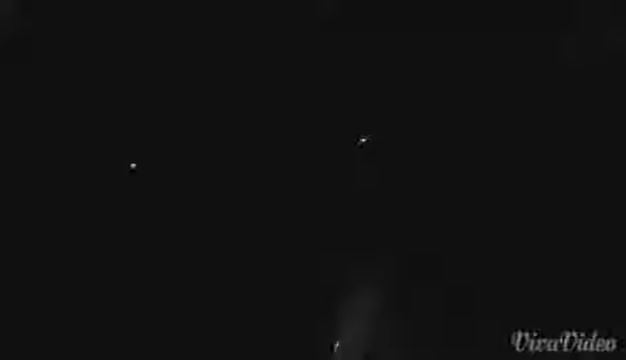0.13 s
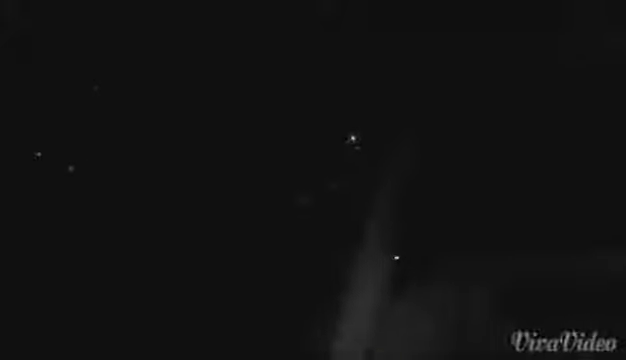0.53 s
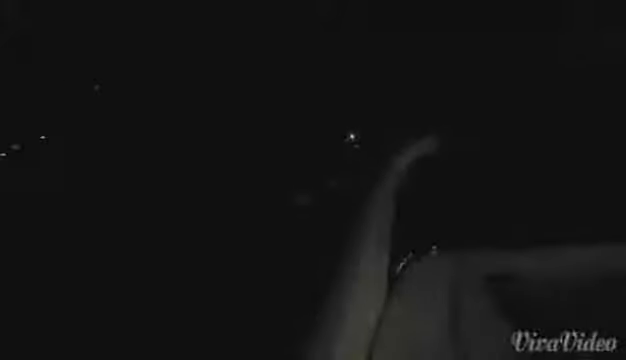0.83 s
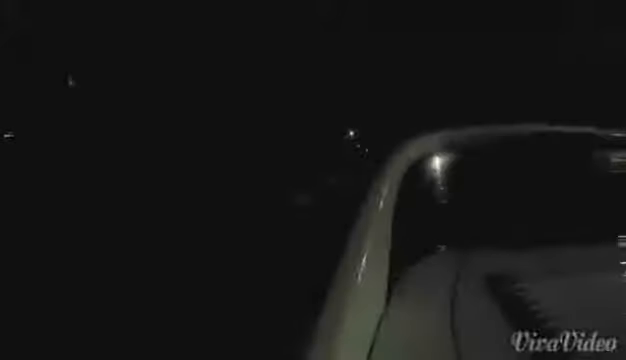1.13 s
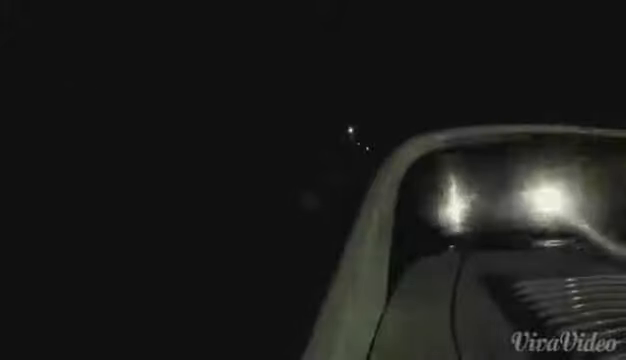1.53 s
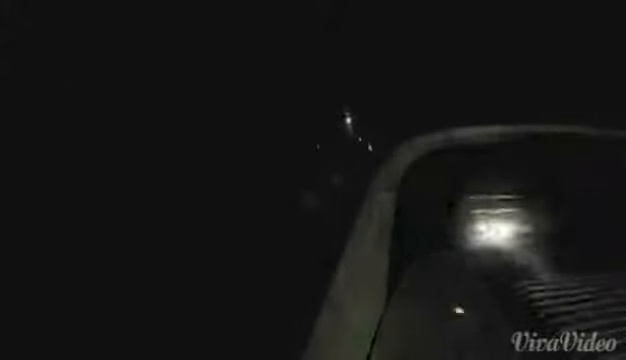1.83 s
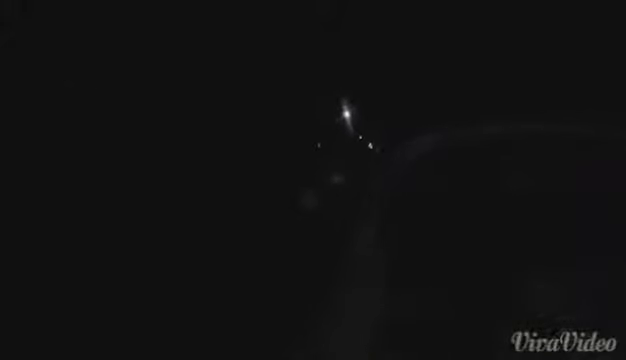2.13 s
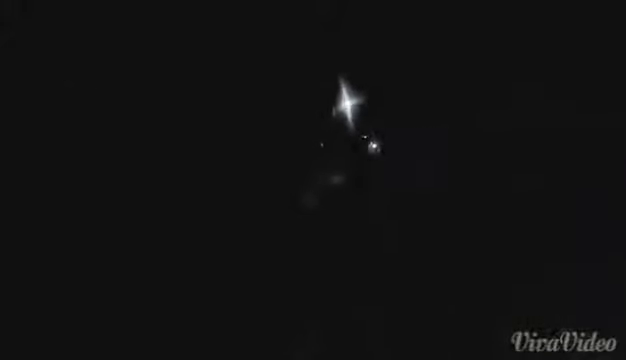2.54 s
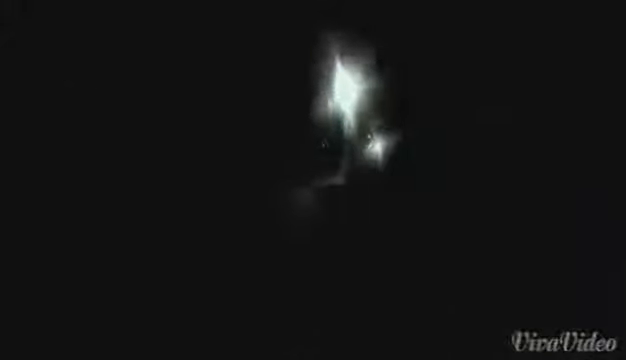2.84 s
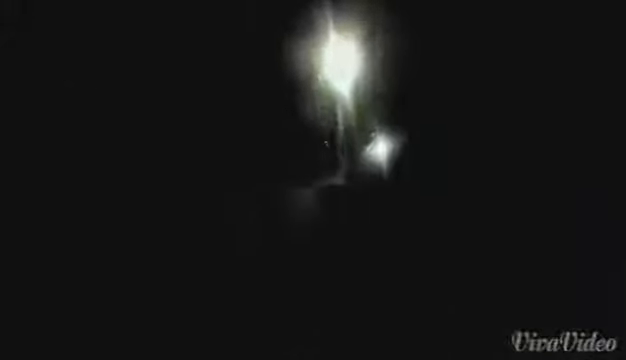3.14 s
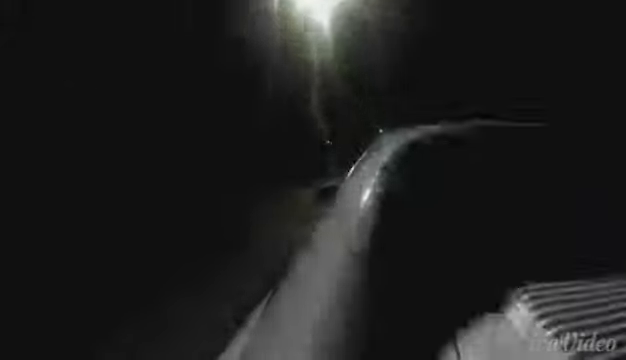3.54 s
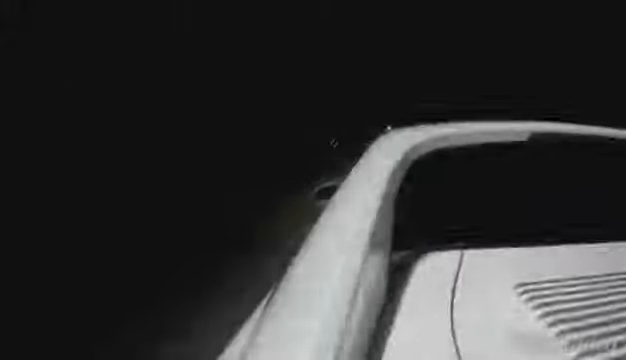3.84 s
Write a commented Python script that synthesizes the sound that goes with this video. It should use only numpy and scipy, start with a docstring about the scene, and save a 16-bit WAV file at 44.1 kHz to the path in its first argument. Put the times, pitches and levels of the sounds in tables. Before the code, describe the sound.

A turbo car pulls and lifts twice, its exhaust droning, with hissing flutter at each lift.

```python
"""On the road, microphone outside the body of a turbocharged four-cylinder car, wind buffeting it.
The car pulls, lifts, pulls and lifts again. The exhaust drones through fixed body resonances,
over road rumble and a rushing roar of air that pulses with the firings. At each lift the compressor
surges in hissing chuffs, falling chirps and hollow hoots; at full boost the turbine briefly whistles."""
import sys
import numpy as np
from scipy import signal
from scipy.fft import rfft, irfft, next_fast_len
from scipy.io import wavfile

SR = 44100
rng = np.random.default_rng(int(sys.argv[2]) if len(sys.argv) > 2 else 0)


def generate_wav(signal):
    """Clip the signal to [-1, 1] and save it as 16-bit WAV at the path in sys.argv[1]."""
    frames = np.transpose(np.atleast_2d(signal))
    scaled = np.clip(frames, -1, 1) * 32767
    pcm = np.round(scaled).astype(np.int16)
    wavfile.write(sys.argv[1], SR, pcm)


N = 175077
T = np.arange(N) / SR

# Engine speed, four firings to a cycle. Each row: time in seconds, firing rate in Hz.
FIRING_RATE = [(.12,85.8),(.5,100.5),(.75,111),(1,122.5),(1.25,137.3),(1.5,156),(1.77,182.5),(1.87,161),(2,153.5),(2.25,138),(2.5,126),(2.7,113),(3,119.8),(3.25,126.8),(3.5,135.3),(3.75,145.8),(3.83,147),(3.97,137)]
# The drone at the firing rate. Each row: time in seconds, level in dB.
DRONE_LEVEL = [(.12,-24.5),(.3,-28),(.45,-17),(.62,-14),(.74,-21.5),(1.0,-16),(1.14,-9.5),(1.28,-8),(1.35,-14),(1.45,-7),(1.58,-17.5),(1.82,-22.5),(1.88,-16),(2.05,-13.5),(2.16,-18.5),(2.42,-25),(2.75,-22.5),(3.21,-18.5),(3.36,-10),(3.68,-10),(3.74,-13),(3.84,-12.5),(3.89,-31),(3.93,-18.5),(3.97,-22)]
# Exhaust throbs around the lowest revs. Each row: start in seconds, length in seconds, level in dB.
DRONE_THROBS = [(2.203,0.059,-10.5),(2.303,0.086,-12),(2.431,0.025,-15.5),(2.474,0.088,-13),(2.561,0.07,-19),(2.659,0.088,-15.5),(2.757,0.056,-10.5),(2.844,0.041,-18),(2.916,0.056,-12)]
# Exhaust overtones, following the load. Each row: time in seconds, relative level in dB.
OVERTONE_LEVEL = [(.13,-29),(.27,-20),(.42,-17),(.56,-21.5),(.68,-19.5),(.82,-19),(1.0,-14.5),(1.3,-18),(1.55,-23),(1.76,-18.5),(1.9,-27.5),(2.15,-20.5),(2.55,-24.5),(2.75,-18),(3.15,-14),(3.5,-17.5),(3.75,-20),(3.9,-33.5),(3.97,-41)]
# The lower overtones. Each row: multiple of the engine cycle, relative strength in dB.
ENGINE_ORDERS = [(3,-2.5),(5,1),(6,-0.5),(7,1),(8,6),(9,-2.5),(10,6),(11,-5.5),(12,1.5),(13,-5.5),(14,2.5),(15,-1.5),(16,4.5)]
# Resonances of exhaust and body. Each row: frequency in Hz, gain in dB.
BODY_RESPONSE = [(60,-5),(100,0),(140,5),(185,-12.5),(203,-1.5),(215,9.5),(229,0.5),(245,-4),(280,3.5),(298,-1),(320,0.5),(370,-7),(415,-12),(462,-4.5),(510,-11.5),(580,-21.5),(650,-15.5),(700,-10),(770,-30),(1200,-16)]
# Uneven firings, burbling off the throttle. Each row: time in seconds, roughness from 0 to 1.
BURBLE_DEPTH = [(.12,.5),(.7,.35),(1.1,.2),(1.7,.2),(1.85,.6),(2.3,.8),(2.75,.65),(2.95,.25),(3.8,.2),(3.9,.7)]

# Rushing air, road rumble, wind on the microphone and fine hiss.
# Each row: time in seconds, relative level in dB.
FLOW_LEVEL = [(.13,-44),(.5,-41),(.75,-38),(.95,-36.5),(1.25,-39.5),(1.55,-40),(1.8,-33.5),(2.0,-35.5),(2.3,-36),(2.5,-39),(2.75,-37.5),(3.0,-33.5),(3.15,-32),(3.32,-33.5),(3.45,-36),(3.7,-39),(3.8,-36.5),(3.97,-39)]
RUMBLE_LEVEL = [(.12,-23),(.2,-31),(.26,-33),(.7,-25),(1.0,-20),(1.25,-25),(1.6,-24.5),(2.0,-24.5),(2.3,-28.5),(2.6,-25.5),(2.85,-23),(3.2,-18),(3.5,-28),(3.97,-26)]
WIND_LEVEL = [(.12,-31),(.9,-27),(1.7,-56),(2.22,-29),(2.45,-36),(2.7,-30),(3.2,-31),(3.6,-41),(3.97,-48)]
HISS_LEVEL = [(.12,-61),(.5,-52.5),(.95,-49.5),(1.25,-54),(1.55,-52.5),(1.72,-46),(1.92,-48),(2.08,-59),(2.55,-57),(2.85,-50.5),(3.1,-46),(3.35,-44.5),(3.6,-47),(3.77,-46),(3.97,-61)]
# Spectra of those four and of the chuffs. Each row: frequency in Hz, relative density in dB.
FLOW_SPECTRUM = [(150,13.5),(300,12),(380,13.5),(470,16),(570,-2),(700,5.5),(920,1.5),(1170,8.5),(1320,3),(1550,9),(1950,6),(2300,0),(2750,1.5),(3300,0),(3900,-2.5),(4250,-15.5),(5200,-21.5),(5750,-8),(6350,-1),(6750,-39),(7600,-22.5),(9300,-51),(12000,-59),(15000,-72)]
RUMBLE_SPECTRUM = [(20,-11),(40,-4),(65,-13.5),(92,10),(112,1.5),(135,18),(155,18),(180,-7),(215,3.5),(250,-11),(400,-39)]
WIND_SPECTRUM = [(12,-57),(24,61),(45,-10),(90,-62),(400,-88)]
HISS_SPECTRUM = [(3000,-13),(6000,5),(7700,10.5),(9300,-0.5),(11800,0),(12800,-15),(15000,-15)]
CHUFF_SPECTRUM = [(900,13),(1700,3),(2400,-6),(3700,10),(4600,-7.5),(6200,15),(7000,1.5),(8200,5.5),(10000,3.5),(12000,-0.5),(15000,-10)]
# Narrow rings in the rushing air, and broader intake resonances that rasp in strong flow.
# Each row: frequency in Hz, resonator width in Hz, level in dB relative to the flow.
FLOW_RINGS = [(210.4,4,-1),(288,25,-18),(463.4,15,0.5),(705.2,17.5,-2),(814,11,-13.5),(1030,16,-9),(1110,18,-8),(1380,29,-5.5),(1615,52,-10),(1717,13,-24.5),(3252,55,-8.5),(3796,51,-21.5)]
INTAKE_RESONANCES = [(1480,270,-1.5),(3760,265,-5.5)]

# Chuffs of the surging compressor. Each row: start in seconds, length in seconds, level in dB.
SURGE_CHUFFS = [(1.374,0.05,-44),(1.47,.045,-44),(1.55,.05,-45),(1.75,.06,-39.5),(1.86,0.045,-38),(1.94,.066,-39),(2.022,.053,-41),(2.113,0.039,-39),(2.184,0.055,-39),(2.267,0.043,-40.5),(2.346,0.029,-39.5),(2.414,.035,-50),(2.478,.035,-60),(2.566,0.045,-43.5),(3.786,.055,-38),(3.88,0.046,-40.5)]
# Compressor chirps and intake pipe hoots.
# Each row: start in seconds, length in seconds, pitch halfway through in Hz, level in dB.
SURGE_CHIRPS = [(1.792,0.057,1194,-23.5),(1.88,0.042,1182,-22.5),(1.953,0.051,1130,-25),(2.052,0.034,1033,-29.5),(2.114,0.052,1046,-30.5),(2.468,0.039,1440,-31),(2.535,0.024,1520,-33),(2.575,0.029,1464,-31.5),(3.791,0.059,1340,-30.5),(3.886,0.051,1160,-25)]
PIPE_HOOTS = [(1.99,0.044,504,-19),(2.03,0.067,467,-29),(2.09,0.076,456,-19),(2.165,0.057,443,-25),(2.225,0.044,433,-20.5),(2.272,0.027,433,-17),(2.335,0.062,396,-22.5),(2.415,0.053,312,-21.5),(3.93,0.059,512,-27)]


def from_db(db):
    """Decibels to gain."""
    return 10 ** (np.asarray(db) / 20)


def unit_rms(x):
    """Scale to an rms of 1."""
    return x / np.sqrt(np.mean(x ** 2) + 1e-20)


def in_time(rows):
    """A control curve at every sample."""
    return np.interp(T, *np.transpose(rows))


def at_hz(spectrum, hz):
    """Read a spectrum in dB along a log-frequency axis."""
    points_hz, db = np.transpose(spectrum)
    return np.interp(np.log(hz + 1e-6), np.log(np.sort(points_hz)), db)


def drift(rate_hz):
    """A smooth random wander, mostly slower than rate_hz, rms 1."""
    step, settle = 40, 2000
    pole = np.exp(-2 * np.pi * rate_hz * step / SR)
    white = rng.standard_normal(N // step + settle + 2)
    slow = signal.lfilter([1], [1, -2 * pole, pole * pole], white)[settle:]
    return np.interp(np.arange(N) / step, np.arange(len(slow)), unit_rms(slow))


def noise(spectrum):
    """Noise of a given spectrum, rms 1."""
    size = next_fast_len(N)
    hz = np.arange(size // 2 + 1) * SR / size
    shaped = rfft(rng.standard_normal(size)) * from_db(at_hz(spectrum, hz))
    return unit_rms(irfft(shaped, size)[:N])


def ringing_air(hz, width_hz, drive=1, stages=1):
    """Noise, scaled by drive, rings a resonance once per stage; rms 1."""
    radius = np.exp(-np.pi * width_hz / SR)
    feedback = [1, -2 * radius * np.cos(2 * np.pi * hz / SR), radius * radius]
    air = rng.standard_normal(N) * drive
    for _ in range(stages):
        air = unit_rms(signal.lfilter([1, 0, -1], feedback, air))
    return air


def swell(start, length, db):
    """A rounded rise and fall that peaks at db."""
    return from_db(db) * np.sin(np.pi * np.clip((T - start) / length, 0, 1))


def falling_tones(rows, fall_per_s, width_hz, pitch_ratio=1):
    """Short rough tones that sag exponentially in pitch."""
    tones = np.zeros(N)
    rough = 1 + .7 * (drift(width_hz) + 1j * drift(width_hz))
    for start, length, hz, db in rows:
        on = (T > start) & (T < start + length)
        age = T[on] - start
        pitch_hz = pitch_ratio * hz * np.exp(-fall_per_s * (age - length / 2))
        phase = 2 * np.pi * np.cumsum(pitch_hz) / SR
        tones[on] += swell(start, length, db)[on] * np.real(rough[on] * np.exp(1j * phase))
    return tones


def exhaust(cycle_phase):
    """The firings drone and throb; uneven cylinders add overtones that sweep through body resonances."""
    cycle_hz = in_time(FIRING_RATE) / 4
    order_db, high_order_db = dict(ENGINE_ORDERS), -5
    burble = in_time(BURBLE_DEPTH)
    overtones = np.zeros(N)
    for order in [3, *range(5, 33)]:
        gain = from_db(order_db.get(order, high_order_db) + at_hz(BODY_RESPONSE, order * cycle_hz))
        waver = np.sqrt(1 - burble ** 2) + burble * (drift(14) + 1j * drift(14)) / np.sqrt(2)
        phase = order * cycle_phase + rng.uniform(0, 2 * np.pi)
        overtones += gain * np.real(waver * np.exp(1j * phase))
    drone = unit_rms(np.cos(4 * cycle_phase) * (1 + .1 * drift(10)))
    drone_gain = from_db(in_time(DRONE_LEVEL)) + sum(swell(*throb) for throb in DRONE_THROBS)
    return drone_gain * drone + from_db(in_time(OVERTONE_LEVEL) - 1) * unit_rms(overtones)


def rushing_air(cycle_phase):
    """Intake air and wind roar, pulsing with the firings; the intake rasps more as the flow grows."""
    roar_db, flicker_db, pulse_depth, rasp_growth = 8.5, 1.3, .11, .8
    pulsing = (1 + pulse_depth * np.cos(4 * cycle_phase)) * from_db(flicker_db * drift(70))
    flow_db = in_time(FLOW_LEVEL)
    roar = from_db(roar_db) * noise(FLOW_SPECTRUM) * pulsing
    rings = sum(from_db(db) * ringing_air(hz, width, drive=pulsing) for hz, width, db in FLOW_RINGS)
    rasp = sum(from_db(db) * ringing_air(hz, width, stages=2) for hz, width, db in INTAKE_RESONANCES)
    rasp *= pulsing * from_db(rasp_growth * (flow_db - flow_db.max()))
    return from_db(flow_db) * (roar + rings + rasp)


def road_rumble():
    """Road and car body rumble low underneath."""
    return from_db(in_time(RUMBLE_LEVEL)) * noise(RUMBLE_SPECTRUM)


def wind_buffet():
    """Wind right on the microphone, a very deep flutter."""
    return from_db(in_time(WIND_LEVEL)) * noise(WIND_SPECTRUM)


def air_hiss(flicker_db=1.8):
    """The air flow carries a fine, flickering hiss on top."""
    return from_db(in_time(HISS_LEVEL) + flicker_db * drift(14)) * noise(HISS_SPECTRUM)


def exhaust_boom(hz=177.3):
    """The exhaust booms once as the first pull begins."""
    return swell(start=.1355, length=.07, db=-12.5) * np.sin(2 * np.pi * hz * T)


def compressor_chuffs():
    """At each lift, air escapes back through the compressor in hissing puffs."""
    return noise(CHUFF_SPECTRUM) * sum(swell(*chuff) for chuff in SURGE_CHUFFS)


def compressor_chirps(fall_per_s=1.78, width_hz=68):
    """The surging compressor chirps: two falling partials and a rasp of air."""
    lower = falling_tones(SURGE_CHIRPS, fall_per_s, width_hz)
    upper = from_db(-9.5) * falling_tones(SURGE_CHIRPS, fall_per_s, width_hz, pitch_ratio=1.58)
    rasp_gain = sum(swell(start, length, db - 9) for start, length, _, db in SURGE_CHIRPS)
    return lower + upper + rasp_gain * ringing_air(hz=1650, width_hz=700, stages=2)


def intake_hoots():
    """The intake pipe gives hollow, falling hoots during the surge."""
    return falling_tones(PIPE_HOOTS, fall_per_s=4.1, width_hz=43)


def turbine_whistle():
    """The turbine gives one breathy whistle at full boost."""
    return ringing_air(hz=4530, width_hz=140) * swell(start=3.35, length=.33, db=-49)


def scene():
    """The moving car at one outside microphone, cutting in abruptly."""
    start_s, fade_s, speed_jitter = .114, .00048, .002
    firing_hz = in_time(FIRING_RATE) * (1 + speed_jitter * drift(15.2))
    cycle_phase = 2 * np.pi * np.cumsum(firing_hz / 4) / SR
    car = exhaust(cycle_phase) + rushing_air(cycle_phase) + road_rumble() + wind_buffet() + air_hiss()
    car += exhaust_boom() + compressor_chuffs() + compressor_chirps() + intake_hoots()
    car += turbine_whistle()
    return (car * np.clip((T - start_s) / fade_s, 0, 1))[None]


def record(dry):
    """Peaks are softly rounded and the treble is gone above 16 kHz."""
    rounded = 1.5 * np.tanh(dry / 1.5)
    lowpass = signal.cheby2(12, 70, 16000, fs=SR, output="sos")
    return signal.sosfilt(lowpass, rounded)


dry = scene()
out = record(dry)
generate_wav(out)
```